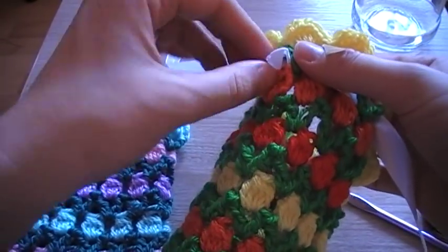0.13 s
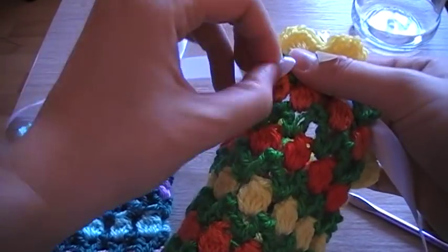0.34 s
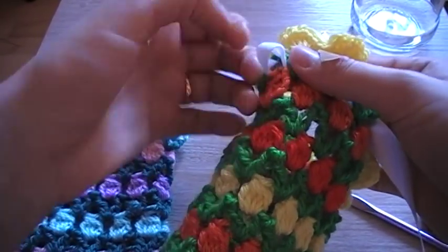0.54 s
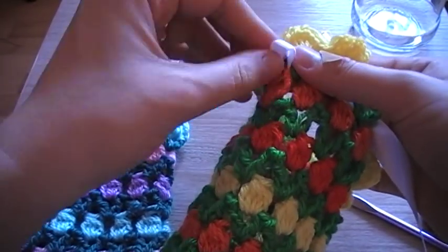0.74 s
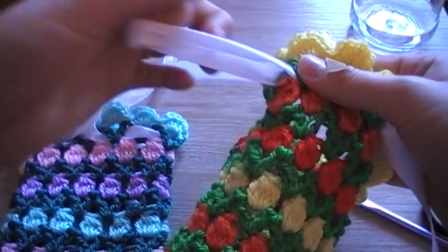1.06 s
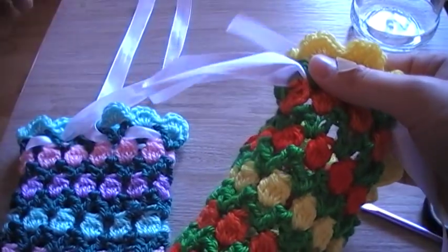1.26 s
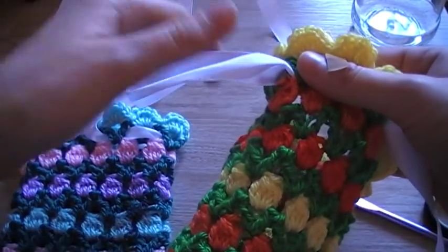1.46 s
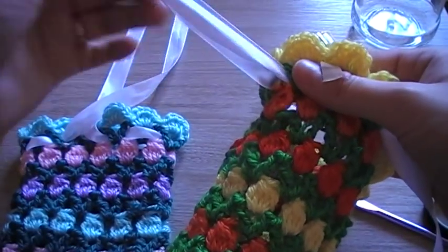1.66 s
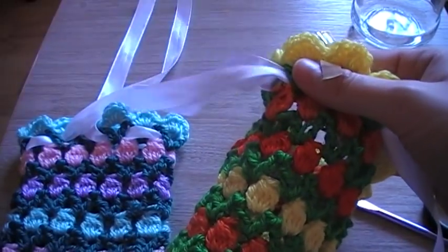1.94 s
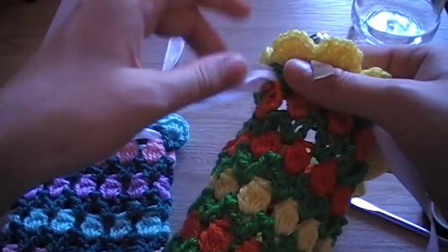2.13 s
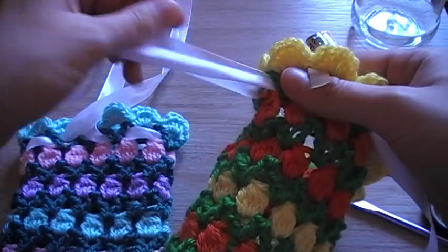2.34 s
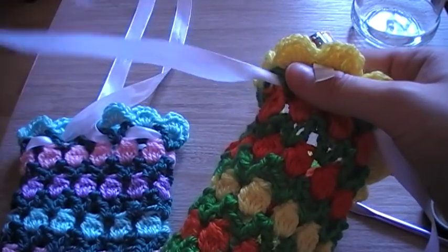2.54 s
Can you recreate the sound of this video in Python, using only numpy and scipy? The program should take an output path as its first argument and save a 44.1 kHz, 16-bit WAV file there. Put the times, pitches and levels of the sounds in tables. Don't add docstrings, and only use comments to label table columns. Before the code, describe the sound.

Ribbon hissing through a crochet stitch, three pulls between light fumbling, ticks and table taps

```python
import sys
import numpy as np
from scipy import signal
from scipy.fft import rfft, irfft, next_fast_len
from scipy.io import wavfile
from scipy.ndimage import uniform_filter1d, map_coordinates

SR = 44100
rng = np.random.default_rng(int(sys.argv[2]) if len(sys.argv) > 2 else 0)


def unload_wav(signal):
    wavfile.write(
        sys.argv[1],
        SR,
        np.round(np.clip(np.atleast_2d(signal).T, -1, 1) * 32767).astype(np.int16),
    )


def volts_from_decibels(level):
    exponent = np.asarray(level, float) / 20
    return 10 ** exponent


N = 119070


def unit(x):
    return x / np.sqrt(np.mean(x ** 2) + 1e-20)


def along(points, hz):
    point_hz, value = np.transpose(points)
    return np.interp(np.log(hz + 1), np.log(point_hz + 1), value)


def wobble(rate_hz):
    knots = rng.standard_normal(int(N * rate_hz / SR) + 4)
    return map_coordinates(knots, [np.arange(N) * rate_hz / SR])


def coloured(x, spectrum):
    m = 2 * next_fast_len(N)
    gain = volts_from_decibels(along(spectrum, np.fft.rfftfreq(m, 1 / SR)))
    cepstrum = irfft(np.log(gain + 1e-6), m)
    cepstrum[1:m // 2] *= 2
    cepstrum[m // 2 + 1:] = 0
    return irfft(rfft(x, m) * np.exp(rfft(cepstrum)), m)[..., :N]


def ring(modes, length_s):
    t = np.arange(round(length_s * SR)) / SR
    rise_s = 0.001
    tones = np.zeros(len(t))
    for hz, db, t60 in modes:
        fade = volts_from_decibels(db + rng.normal(0, 1) - 60 * t / t60)
        tones += fade * np.sin(2 * np.pi * (hz * t + rng.random()))
    return (1 - np.exp(-t / rise_s)) * tones


def add(track, start_s, sound):
    part = track[round(start_s * SR):][:len(sound)]
    part += sound[:len(part)]


# hz, level_db [dB per Hz]
HISS_COMMON = [(18, -56), (40, -29), (100, -16), (721, -5.5), (1430, -8), (1960, -8.5), (2170, -6),
               (2350, -13.5), (8520, -16), (16000, -32.5)]
# hz, level_db [dB per Hz]
HISS_BETWEEN = [(18, -58), (40, -23), (100, -15), (227, -2), (394, -1), (569, 1.5), (1190, -3), (2170, -8),
                (4080, -13.5), (16000, -30)]
# pitch_hz, level_db [dB rms]
MOTOR_WHINE = [(726.7, -85.5), (1093, -83), (1459, -80), (2186, -75), (3187, -89), (3644, -82)]


def camera():
    t = np.arange(N) / SR
    mid = volts_from_decibels(-67) * unit(coloured(rng.standard_normal(N), HISS_COMMON))
    side = volts_from_decibels(-61) * unit(coloured(rng.standard_normal(N), HISS_BETWEEN))
    scan_line = (15628, -92)
    for hz, db in MOTOR_WHINE + [scan_line]:
        mid += np.sqrt(2) * volts_from_decibels(db + wobble(12)) * np.sin(2 * np.pi * hz * t)
    return np.array([mid + side, mid - side])


def stroke(points, sheen_db):
    t = np.arange(N) / SR
    attack_s, release_s, yarn_db = 0.0078, 0.018, -13
    s, db, grip_db, high_share = np.transpose(points)
    start = np.clip((t - s[0]) / attack_s, 0, 1)
    stop = volts_from_decibels(-60 * np.clip(t - s[-1], 0, 1) / release_s)
    power = (volts_from_decibels(np.interp(t, s, db)) * start * stop) ** 2
    high = np.clip(np.interp(t, s, high_share), 0, 1)
    yarn = volts_from_decibels(np.interp(t, s, grip_db) + yarn_db) ** 2
    sheen = np.full(N, volts_from_decibels(sheen_db) ** 2)
    return power * np.array([1 - high, high, yarn, sheen])


# start_s, length_s, start_level_db, end_level_db, grip_db (more grip, more yarn)
FINGER_BRUSHES = [(0, 0.1, -63, -77, 13), (0.136, 0.077, -58, -78, 11.5), (0.211, 0.11, -58.5, -59, 11.5),
                  (0.314, 0.082, -69.5, -58.5, 12), (0.387, 0.049, -55, -54, 8.5),
                  (0.437, 0.035, -54.5, -52.5, 10), (0.473, 0.041, -53.5, -46.5, 9),
                  (0.533, 0.056, -58.5, -55, 9.5), (0.585, 0.064, -58, -61.5, 7.5),
                  (0.661, 0.054, -59, -56.5, 7), (0.721, 0.013, -42.5, -48, 6),
                  (1.139, 0.043, -78, -69, 18), (1.185, 0.06, -53, -62.5, 10.5),
                  (1.239, 0.026, -57.5, -64, 7.5), (1.506, 0.029, -70, -59.5, 12),
                  (1.534, 0.011, -41.5, -40.5, -4), (1.552, .011, -67, -67, 23),
                  (1.264, 0.025, -73, -67.5, 15), (1.796, 0.067, -67, -67, 5),
                  (1.864, 0.072, -59.5, -70, 9), (1.941, 0.048, -64.5, -71, 10),
                  (2.194, 0.015, -41, -36, -23), (2.516, 0.049, -46.5, -45, 2.5),
                  (2.578, 0.13, -68, -67.5, 11.5), (2.692, .01, -65.5, -58, 17)]


def brushes():
    powers = np.zeros((4, N))
    for s, length_s, start_db, end_db, grip_db in FINGER_BRUSHES:
        points = [(s, start_db, grip_db, 0.5), (s + length_s, end_db, grip_db, 0.5)]
        powers += stroke(points, sheen_db=-28)
    return powers


# start_s, level_db, length_s
STITCH_SNAPS = [(0, -56, 0.017), (0.513, -58, 0.012), (0.609, -56.5, 0.014), (0.717, -54, 0.018),
                (1.104, -47, 0.013), (1.188, -47, 0.0058), (1.193, -62, 0.067), (1.538, -54, 0.014),
                (1.684, -37.5, 0.0036), (1.741, -45.5, 0.0092), (1.747, -36.5, 0.007), (2.199, -48.5, 0.02),
                (2.48, -40, 0.035)]
# hz, level_db [dB per Hz]
SNAP_COLOUR = [(250, -32.5), (480, -3.5), (1300, 0.5), (2100, 4), (3000, -19), (6000, -8.5), (11000, -62)]


def snaps():
    out = np.zeros(N)
    noise = unit(coloured(rng.standard_normal(N), SNAP_COLOUR))
    for s, db, length_s in STITCH_SNAPS:
        progress = np.linspace(0, 1, round(1.21 * length_s * SR) + 3)
        shape = np.sin(np.pi * progress ** 0.5) ** 2
        piece = noise[round(s * SR):][:len(shape)]
        add(out, s, volts_from_decibels(db - 5) * unit(shape * piece))
    return out


# start_s, level_db, centre_hz, width_octaves
KNUCKLE_KNOCKS = [(.092, -54.5, 600, .6), (.097, -60.5, 794, 0.71), (0.1253, -46, 840, 0.43),
                  (.14, -62, 940, 0.76), (.148, -58, 1320, 0.54), (0.16, -62, 870, 1),
                  (0.511, -63, 275, 0.69), (1.108, -61.5, 643, 1), (1.149, -54, 875, 0.67),
                  (1.153, -53.5, 840, 0.75), (1.163, -64, 1150, .5), (1.199, -51, 497, 0.97),
                  (1.202, -46.5, 596, 0.53), (1.204, -46.5, 1300, .4), (1.211, -53, 283, 0.2),
                  (1.214, -46.5, 1310, 0.48), (1.243, -58, 1200, 0.47), (1.258, -60.5, 900, 1),
                  (2.404, -48, 1350, 0.67), (2.406, -56, 457, 0.77), (2.411, -46.5, 373, .2),
                  (2.483, -44, 990, 1), (2.488, -50, 1920, 0.4), (2.491, -44, 370, 0.1),
                  (2.497, -41, 2020, 0.21), (2.511, -44, 1510, .7), (2.53, -49.5, 447, .4)]
# pitch_hz, level_db, t60_s (time to fade by 60 dB)
TABLE_TONES = [(275, -3, .08), (365, 0, .085), (565, 0, .05), (740, -6, .05), (860, 0, .05),
               (1125, -5, .05), (1290, 0, .06), (1400, -6, .04), (1660, -2, .04), (2000, 0, .035),
               (2260, -4, .035)]


def knocks():
    out = np.zeros(N)
    for s, db, centre_hz, width in KNUCKLE_KNOCKS:
        modes = []
        for hz, level_db, t60 in TABLE_TONES:
            octaves = np.log2(hz / centre_hz)
            detuned_hz = hz * (1 + 0.01 * rng.normal())
            modes.append((detuned_hz, level_db - 6 * (octaves / width) ** 2, t60))
        add(out, s, volts_from_decibels(db) * ring(modes, length_s=0.2))
    return out


# start_s, peak_db
THREAD_TICKS = [(0.572, -43), (.717, -34), (0.816, -53), (1.1884, -40.5), (1.2557, -48), (1.4284, -49.5),
                (1.474, -58), (1.512, -37.5), (1.8825, -53), (1.9484, -56), (2.0126, -48.5), (2.032, -47),
                (2.0582, -48), (2.0654, -52), (2.123, -51)]
# hz, level_db [dB per Hz]
TICK_COLOUR = [(3000, -30), (5500, -4), (8000, 0), (11000, -6), (14000, -24)]


def ticks():
    out = np.zeros(N)
    fade = volts_from_decibels(-0.63 * np.arange(30))
    for s, db in THREAD_TICKS:
        add(out, s, volts_from_decibels(db + 8) * rng.standard_normal(30) * fade)
    return coloured(out, TICK_COLOUR)


# time_s, level_db (from speed), high_weave_share [0-1]
RIBBON_PULLS = [
    [(.738, -71, 0.7), (.775, -53.5, 0.5), (.86, -51.5, 0.1), (.915, -45, 0.2), (1.0, -42, 0.44),
     (1.105, -38.5, 0.65), (1.111, -47, 0.4), (1.132, -87, 0.1)],
    [(1.562, -43, 0.6), (1.6, -38.5, 0.7), (1.65, -35, 0.04), (1.725, -39.5, 0.85), (1.745, -35.5, 0.15),
     (1.755, -47, 1), (1.767, -65, 0.5), (1.778, -42.5, 0.15)],
    [(2.154, -55, 0.4), (2.195, -46, 1), (2.232, -45, 0.74), (2.25, -46.5, 0.84), (2.31, -38.5, 0.96),
     (2.385, -36.5, 1), (2.415, -36.5, 0.6), (2.5, -38, 0.42), (2.515, -50.5, 0.8)],
]
PULL_SHEEN_DB = [-15.5, -13.5, -17]


def pulls():
    powers = np.zeros((4, N))
    for pull, sheen_db in zip(RIBBON_PULLS, PULL_SHEEN_DB):
        points = [(s, db, -0.5 * (db + 34), high) for s, db, high in pull]
        powers += stroke(points, sheen_db)
    return powers


def snags(spectrum):
    snags_per_s, spread_db, snag_share = 5000, 3, 0.45
    flutter_db, patchy_db = 1.5, 1.7
    hits = (rng.random(N) < snags_per_s / SR) * rng.standard_normal(N)
    hits = hits * volts_from_decibels(spread_db * rng.standard_normal(N))
    rub = np.sqrt(snag_share) * unit(hits) + np.sqrt(1 - snag_share) * rng.standard_normal(N)
    rub = rub * volts_from_decibels(flutter_db * (0.5 * wobble(40) + wobble(150)))
    z = signal.stft(rub, nperseg=256)[2]
    patches = uniform_filter1d(rng.standard_normal(z.shape), size=7, axis=0)
    patches = uniform_filter1d(patches, size=14, axis=1)
    rub = signal.istft(z * volts_from_decibels(patchy_db * unit(patches)), nperseg=256)[1][:N]
    return unit(coloured(rub, spectrum))


# hz, level_db [dB per Hz]
LOW_WEAVE = [(1760, -70.5), (3000, -16.5), (3700, -3.5), (4600, -13), (6090, 1), (8170, 5), (10600, -9.5),
             (12600, -13.5), (16000, -36)]
# hz, level_db [dB per Hz]
HIGH_WEAVE = [(1760, -51), (3000, -13), (3650, -15.5), (4570, -28.5), (4900, -11), (9200, 3), (12100, -7.5),
              (13600, -12.5), (16000, -26.5)]
# hz, level_db [dB per Hz]
YARN_BODY = [(120, -41), (200, -14), (470, -17.5), (784, -3), (957, -6), (2950, -3), (3540, -1.5),
             (4580, -5.5), (6000, -6), (7800, -34), (13200, -120)]
# hz, level_db [dB per Hz]
EDGE_SHEEN = [(8000, -49), (10500, -9), (13000, 11), (14500, -1), (16000, -9)]
# hz, level_db
STEREO_WIDTH = [(60, 5), (110, 13), (200, -21), (380, 2), (700, -23), (1290, -9), (2380, -68), (4400, -27),
                (6500, -27), (8800, -4.5), (11500, -9.5), (15000, -10)]


def rubbing():
    gains = np.sqrt(brushes() + pulls())
    colours = (LOW_WEAVE, HIGH_WEAVE, YARN_BODY, EDGE_SHEEN)
    mid = sum(gain * snags(colour) for gain, colour in zip(gains, colours))
    side = sum(gain * snags(colour) for gain, colour in zip(gains, colours))
    return mid, coloured(side, STEREO_WIDTH)


def swell(peak_s, rise_s, fall_s):
    t = np.arange(N) / SR - peak_s
    return np.exp(-(t / np.where(t < 0, rise_s, fall_s)) ** 2)


# hz, level_db [dB per Hz]
VEHICLE_RUMBLE = [(70, -38), (105, -6), (135, 1), (165, -12.5), (205, -4.5), (240, -10), (400, -49)]
# start_s, level_db
SQUEAKS = [
    (2.012, -68),
    (2.096, -69),
]


def outside():
    t = np.arange(N) / SR
    rumble = volts_from_decibels(-72) * unit(coloured(rng.standard_normal(N), VEHICLE_RUMBLE))
    rumble = rumble * swell(1.73, rise_s=0.16, fall_s=0.33)
    drone = volts_from_decibels(-66.5 + wobble(22.5)) * np.sin(2 * np.pi * 209 * t)
    drone = drone * swell(1.858, rise_s=0.038, fall_s=0.038)
    half_s = 0.017 / 2
    squeak_gain = sum(volts_from_decibels(db) * swell(s + half_s, half_s, half_s) for s, db in SQUEAKS)
    return rumble + drone + squeak_gain * np.sin(2 * np.pi * 3220 * t)


def dish():
    out, t = np.zeros(N), np.arange(N) / SR
    tone = ring([(1670, -47.5, 0.68)], length_s=0.3)
    beat = 1 - 0.45 * np.cos(2 * np.pi * 11.8 * t)
    rough = beat * volts_from_decibels(2.2 * wobble(66))
    add(out, 2.487, tone * rough[:len(tone)])
    return out


# hz, t60_s
ROOM_FADE = [(300, 0.5), (1200, 0.28), (3000, 0.32), (9000, 0.18)]


def room(x):
    hz, t, z = signal.stft(rng.standard_normal((2, SR // 2)), SR, nperseg=256)
    fade = volts_from_decibels(-60 * t / along(ROOM_FADE, hz)[:, None])
    tail = signal.istft(z * fade, SR, nperseg=256)[1]
    tail = tail / np.linalg.norm(tail[0])
    delayed = np.pad(x, (200, 0))[None]
    return signal.fftconvolve(delayed, tail, axes=1)[:, :N]


# hz, level_db
MICROPHONE = [(60, -58), (150, -8.5), (300, 0.5), (16000, -0.5)]
# hz, level_db
PORT_GAP = [(3000, 0), (7000, 0), (9000, 0.4), (12000, -0.7), (16000, 0.5)]


def scene():
    mid, side = rubbing()
    mid = mid + ticks() + snaps() + knocks() + dish() + outside()
    wet = volts_from_decibels(-10.5) * room(mid)
    side = side + coloured(wet[1], STEREO_WIDTH)
    mid, side = coloured(np.array([mid + wet[0], side]), MICROPHONE)
    left = coloured(mid + side, PORT_GAP)
    right = coloured(mid - side, [(hz, -db) for hz, db in PORT_GAP])
    left_db = -0.44
    return np.array([left, right]) * volts_from_decibels([[left_db], [-left_db]]) + camera()


def roll_off(x):
    return signal.sosfilt(signal.butter(12, 16450, fs=SR, output="sos"), x)


def record(dry):
    m = next_fast_len(N)
    kept = np.fft.rfftfreq(m, 1 / SR) < 15800
    mix = irfft(rfft(dry, m) * kept, m)[:, :N]
    return roll_off(mix)


dry = scene()
out = record(dry)
unload_wav(out)
```